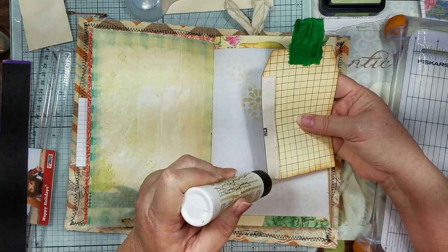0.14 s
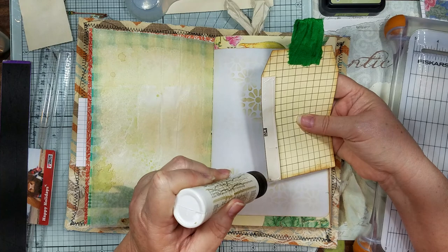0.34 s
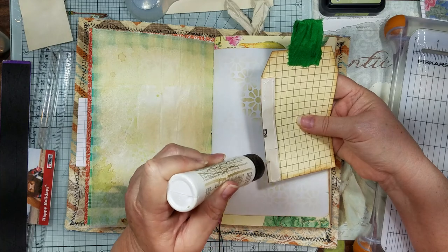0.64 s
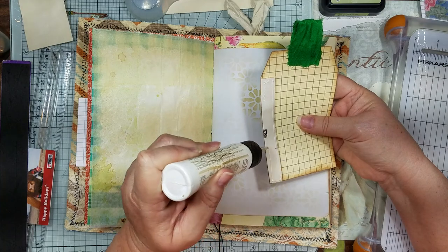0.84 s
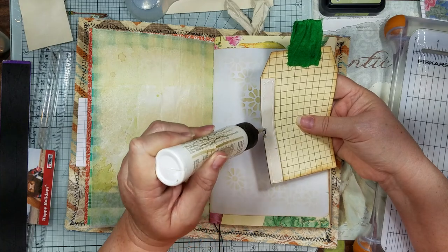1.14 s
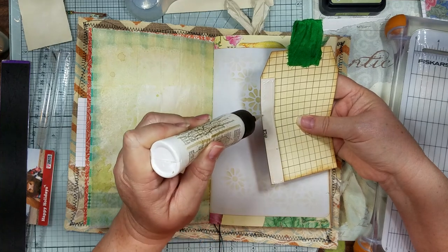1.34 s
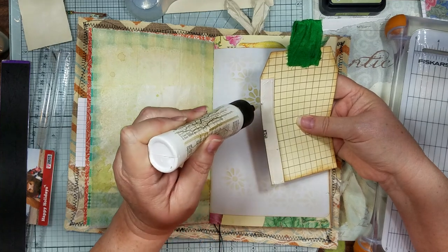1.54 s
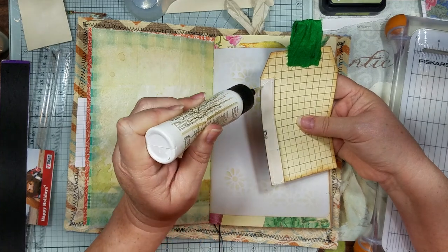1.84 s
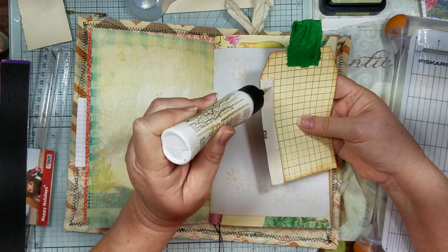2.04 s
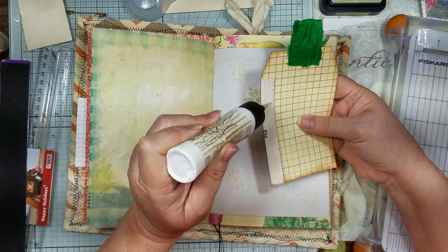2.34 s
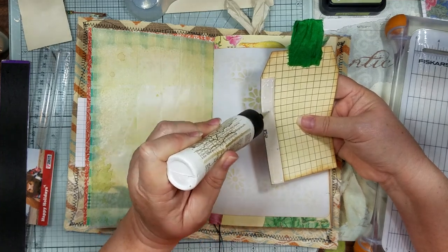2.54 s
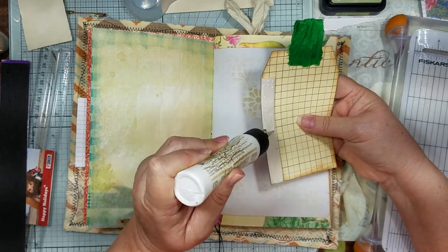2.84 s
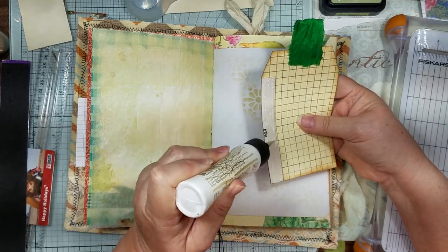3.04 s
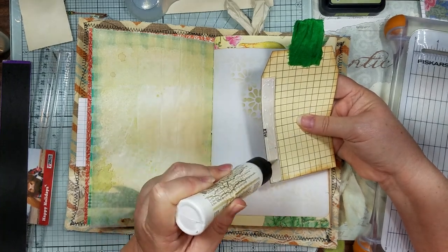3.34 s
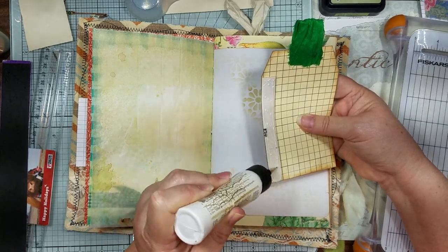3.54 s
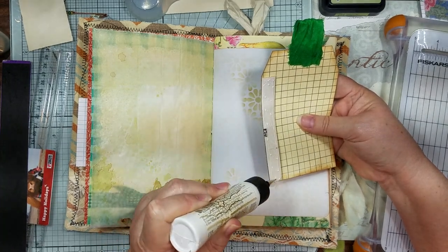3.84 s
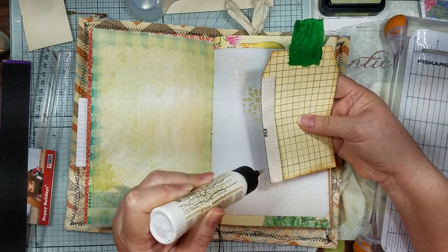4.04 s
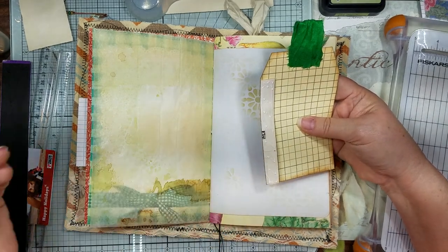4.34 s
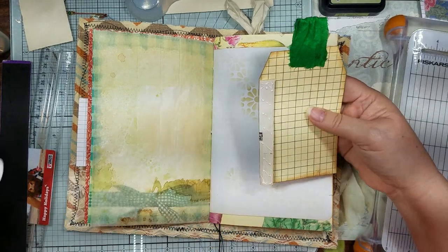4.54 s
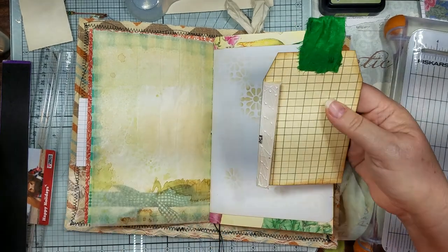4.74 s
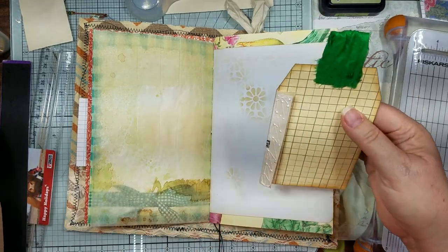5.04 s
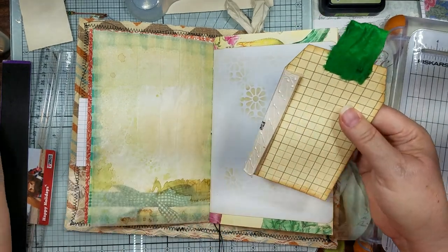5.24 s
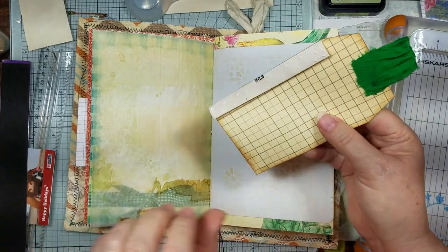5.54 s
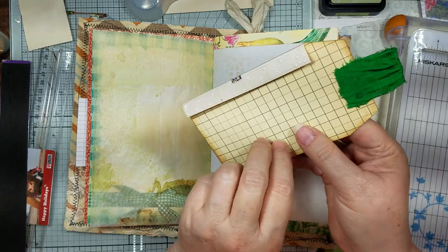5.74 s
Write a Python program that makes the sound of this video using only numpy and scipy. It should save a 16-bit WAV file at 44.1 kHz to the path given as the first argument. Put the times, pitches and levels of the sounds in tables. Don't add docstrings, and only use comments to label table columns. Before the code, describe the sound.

Quiet close-up crafting: steady ventilation hum, light fizzy zigzag scratching on card, then a bottle set down and crisp paper clicks.

```python
import sys
import numpy as np
from scipy import signal
from scipy.fft import rfft, irfft, next_fast_len
from scipy.io import wavfile
from scipy.ndimage import uniform_filter1d, map_coordinates

SR = 44100
rng = np.random.default_rng(int(sys.argv[2]) if len(sys.argv) > 2 else 0)


def transcribe(u):
    v = np.clip(np.atleast_2d(u).T, -1, 1)
    q = np.round(v * 32767).astype(np.int16)
    wavfile.write(sys.argv[1], SR, q)


def makeup_ratio(level_db):
    decades = np.asarray(level_db, float) / 20
    return 10 ** decades


N = 260013
TOP_HZ = 15800
TIP_LAG, CLOTH_LAG, AIR_LAG = 1, 0, -4
# (f/Hz, likeness 0..1)
ALIKE = [(60, 0.94), (130, 1), (290, 0.94), (640, .8), (1410, 0.5), (3100, 0.016)]


def along(points, hz):
    f, v = np.transpose(points)
    return np.interp(np.log(hz + 1), np.log(f + 1), v)


def unit(x):
    return x / np.sqrt(np.mean(x ** 2) + 1e-20)


def filtered(x, response):
    m = next_fast_len(x.shape[-1] + 4096)
    spectrum = rfft(x, m) * response(np.fft.rfftfreq(m, 1 / SR))
    return irfft(spectrum, m)[..., :x.shape[-1]]


def peak(f, hz, width):
    return 1j * f * width / (hz * hz - f * f + 1j * f * width)


def swell(length, sharp):
    return np.sin(np.linspace(0, np.pi, round(length * SR))) ** sharp


def add(out, x, s, pan_db, lag, wet_db):
    # (f/Hz, t60/s)
    walls = [(150, 0.43), (1000, 0.063), (10000, 0.039)]
    hz, t, z = signal.stft(rng.standard_normal((2, SR // 8)), SR, nperseg=128)
    alike = np.clip(along(ALIKE, hz), 0, 1)[:, None]
    z[1] = alike * z[0] + np.sqrt(1 - alike ** 2) * z[1]
    decay = makeup_ratio(-60 * t / along(walls, hz)[:, None])
    tail = signal.istft(z * decay, SR, nperseg=128)[1]
    tail[:, :40] = 0
    heard = makeup_ratio(wet_db) * tail / np.linalg.norm(tail[0])
    heard[:, 0] = 1
    for ear, path, side in zip(out, heard, (1, -1)):
        start = round(s * SR) + (side > 0) * round(lag)
        part = ear[start:][:len(x) + len(path) - 1]
        part += makeup_ratio(side * pan_db / 2) * signal.fftconvolve(x, path)[:len(part)]


def hum():
    # (f/Hz, width/Hz, level/dB)
    room_modes = [(57.4, 8.1, -8), (76, 12.4, -7.5), (106.5, 16.7, -4), (120.3, 7.4, 1.5), (135, 13.3, -2),
                  (168.7, 21.4, -0.5), (182.9, 16.3, -8.5), (246.4, 30, -8), (298, 40, -18.5),
                  (377, 34, -28.5), (494.7, 48, -22.5), (611, 38, -22.5), (677, 8.6, -22)]
    # (f/Hz, density/dB per Hz)
    airflow = [(25, -34), (50, -18), (200, -24), (400, -24.5), (800, -27.5), (1500, -30), (3000, -37.5),
               (5000, -48), (7000, -56), (9000, -101)]
    level_db, drift_db, drifts_per_s = -50, 1, 2.24

    def colour(f):
        modes = sum(abs(makeup_ratio(db) * peak(f, hz, w) ** 2) ** 2 for hz, w, db in room_modes)
        return np.sqrt(makeup_ratio(2 * along(airflow, f)) + modes)

    def mid_and_side(f):
        angle = np.arccos(np.clip(along(ALIKE, f), -1, 1)) / 2
        return colour(f) * [np.cos(angle), np.sin(angle)]

    mid, side = filtered(rng.standard_normal((2, N)), mid_and_side)
    drift = map_coordinates(rng.standard_normal(30), [np.arange(N) / SR * drifts_per_s])
    pair = unit(np.array([np.roll(mid + side, 12), makeup_ratio(0.6) * (mid - side)]))
    return makeup_ratio(level_db + drift_db * drift) * pair


def rubbing(rows, glide, pan_db, lag, wet_db, grit_db, sharp, fizz_width, card_width, broad):
    # (f/Hz, density/dB per Hz)
    fibres = [(300, -120), (600, -21), (1000, -7), (2200, -11.5), (3200, -26), (5000, -26.5), (8000, -86)]
    out = np.zeros((2, N))
    for s, length, fizz_db, card_db, card_hz, fizz_hz in rows:
        shape = swell(1.15 * length, sharp)
        grains = uniform_filter1d(rng.standard_normal((2, len(shape))), 70)
        catches = rng.standard_normal((2, len(shape))) * makeup_ratio(grit_db * unit(grains))

        def fizz_colour(f):
            sheen = (f / 6500) ** 4 / (1 + (f / 6500) ** 4)
            return (peak(f, fizz_hz, fizz_width) + 1.06 * sheen) * (f < TOP_HZ)

        fizz = filtered(catches[0], fizz_colour)
        first, last = (filtered(catches[1], lambda f: peak(f, hz, card_width) + broad * makeup_ratio(along(fibres, f)))
                       for hz in card_hz * glide ** np.array([-.5, .5]))
        bend = np.clip(np.linspace(-.25, 1.25, len(shape)), 0, 1)
        card = (1 - bend) * first + bend * last
        rub = makeup_ratio(fizz_db + 3.0) * unit(fizz) + makeup_ratio(card_db - 0.5) * unit(card)
        add(out, shape * rub, s - length / 12, pan_db, lag, wet_db)
    return out


def handling():
    # (t/s, length/s, fizz level/dB, card level/dB, card f/Hz)
    rustles = [(.06, .24, -77, -69, 990), (4.39, 0.047, -68, -62, 1470), (4.45, 0.11, -69.5, -69, 1500),
               (4.566, .12, -77, -72, 1850), (4.648, .17, -84, -73, 3280), (4.83, 0.087, -71, -68, 1800),
               (5.083, .04, -72, -69, 1300), (5.229, .035, -74, -61.5, 1190),
               (5.234, 0.025, -90, -66, 3120), (5.219, .17, -73.5, -80, 1000), (5.4, .37, -97, -68.5, 1840),
               (5.45, 0.52, -103, -74.5, 3060), (5.754, 0.037, -66.5, -71, 2220),
               (5.804, .02, -73, -74, 1800), (5.813, 0.084, -72, -66, 1810)]
    cloth_hz = 12600
    rows = [(*row, cloth_hz) for row in rustles]
    return rubbing(rows, glide=0.96, pan_db=-0.8, lag=CLOTH_LAG, wet_db=3, grit_db=2.5, sharp=0.35,
                   fizz_width=41000, card_width=380, broad=1.9)


def whistles():
    # (t/s, length/s, level/dB, f/Hz, width/Hz)
    squeaks = [
        (.32, 0.072, -66, 780, 450),
        (0.068, 0.2, -69.5, 9100, 1400),
        (4.4, 0.022, -57.5, 4540, 980),
        (4.46, 0.099, -65.5, 4170, 430),
    ]
    out = np.zeros((2, N))
    for s, length, db, hz, width in squeaks:
        shape = swell(length, .9)
        air = filtered(rng.standard_normal(len(shape)), lambda f: peak(f, hz, width) ** 2)
        add(out, makeup_ratio(db) * shape * unit(air), s, -3.5, AIR_LAG, wet_db=-0.5)
    return out


def nozzle():
    # (t/s, length/s, pressure level/dB, card f/Hz, card over fizz/dB)
    strokes = [(0.617, 0.04, -76, 1690, 3), (.7, .1, -79, 1110, 4), (.93, 0.047, -78, 1100, 1),
               (1.1, 0.16, -79.5, 1900, 1), (1.598, .12, -79.5, 1600, 3), (1.972, 0.044, -85, 1900, 10),
               (2.109, 0.055, -73, 1780, 8), (2.237, .08, -71.5, 1730, 5), (2.343, .055, -71.5, 1860, 13),
               (2.488, 0.06, -75, 1370, 12), (2.606, 0.051, -77.5, 1470, 17.5),
               (2.707, .105, -69, 1280, 5.5), (2.838, 0.074, -69, 1520, 4.5),
               (2.961, 0.084, -65, 1400, 0.5), (3.095, .061, -67.5, 1770, 4),
               (3.23, 0.089, -67.5, 1390, -1), (3.361, .07, -69, 1400, 2.5),
               (3.485, 0.078, -67.5, 1660, 2.5), (3.611, 0.052, -70.5, 1150, 1),
               (3.709, 0.086, -74, 1300, 0), (3.84, 0.065, -82.5, 1140, 12), (3.965, 0.026, -73, 1050, 0),
               (4.147, 0.042, -75, 1030, -6)]
    # (t/s, f/Hz)
    tip_path = [(2.1, 11100), (2.3, 10400), (2.5, 11300), (3.02, 10500), (3.26, 8200), (3.55, 9150),
                (3.64, 12000), (4.1, 12600)]
    s, length, db, card_hz, boom_db = np.transpose(strokes)
    fizz_hz = np.interp(s, *np.transpose(tip_path))
    rows = zip(s, length, db, db + boom_db, card_hz, fizz_hz)
    return rubbing(rows, glide=1.14, pan_db=-3.5, lag=TIP_LAG, wet_db=-1.0, grit_db=5.5, sharp=0.72,
                   fizz_width=680, card_width=200, broad=1.4)


def snaps():
    # (t/s, peak level/dB, ring f/Hz, ring level/dB, pushes 1 or pulls -1)
    releases = [(3.142, -44, 3600, -7, 1), (3.98, -52, 9000, -12, 1), (4.4027, -40, 1600, 0, 1),
                (4.805, -42, 7000, -18, 1), (5.0802, -24.5, 2320, -17, 1), (5.081, -30.5, 1330, -4.5, 1),
                (5.0821, -41, 4800, -1, -1), (5.0854, -34, 1250, -1.5, -1), (5.113, -53, 12500, 1, 1),
                (5.7688, -29.5, 1190, -16, -1), (5.7697, -37, 4800, -7, -1), (5.8, -24.5, 1830, -11.5, -1)]
    t60_at_1k, slope = 0.0085, 0.48
    out, t = np.zeros((2, N)), np.arange(SR // 20) / SR
    spike = (1 - t / 0.0018) * np.exp(-t / .00009)
    for s, db, hz, ring_db, way in releases:
        t60 = t60_at_1k * (1000 / hz) ** slope
        crackle = 0.35 * np.diff(rng.standard_normal(len(t) + 1)) * makeup_ratio(-60 * t / (0.62 * t60))
        ring = makeup_ratio(ring_db - 60 * t / t60) * np.cos(2 * np.pi * hz * t)
        add(out, makeup_ratio(db) * (crackle + np.sign(way) * (.8 * spike + ring)), s, .5, TIP_LAG, wet_db=-5.5)
    return out


def thuds():
    # (t/s, level/dB, contact/s, left lag/samples, left over right/dB)
    blows = [
        (4.46, -20, .0006, 7, -1.5),
        (4.8458, -25, .0005, -5, 0),
    ]
    # (f/Hz, level/dB, t60/s, moves with 1 or against -1 the blow)
    desk = [(164, -2.5, .057, 1), (212, -4, .13, 1), (320, -7, .08, -1), (410, 5.5, .011, -1),
            (618, 0, .052, 1), (862, -9, .05, -1), (1235, -12, .04, -1), (1700, -28, .04, 1)]
    book = [(108, .5, .07, 1), (166, 0, .065, -1), (396, -14, .17, -1), (838, -17, .045, -1),
            (1211, -22, .04, 1)]
    rattle_levels = (-16, -30)
    out, t = np.zeros((2, N)), np.arange(SR // 4) / SR
    for (s, db, contact, lag, pan_db), modes, rattle_db in zip(blows, (desk, book), rattle_levels):
        ring = sum(way * makeup_ratio(level - 60 * t / t60) * np.sin(2 * np.pi * hz * t)
                   for hz, level, t60, way in modes)
        loose = unit(filtered(rng.standard_normal(len(t)),
                              lambda f: peak(f, 620, 1170) ** 2 + 0.2 * peak(f, 2000, 1200)))
        rattle = makeup_ratio(rattle_db - 60 * t / 0.16) * loose
        onset = (1 - np.exp(-t / contact)) ** 2
        add(out, makeup_ratio(db) * (ring + rattle) * onset, s, pan_db, lag, wet_db=-19.0)
    return filtered(out, lambda f: f ** 2 / (50 ** 2 + f ** 2) / (1 + (f / 2800) ** 4))


def housing(f):
    return 1 - 0.5 * peak(f, 7400, 4000) + 0.23 * peak(f, 17000, 5200)


def scene():
    paper = filtered(handling() + snaps(), housing)
    return hum() + paper + whistles() + nozzle() + thuds()


def band_limit(x):
    return signal.sosfilt(signal.butter(12, 16590, fs=SR, output="sos"), x)


def record(dry):
    # (f/Hz, density/dB per Hz)
    hiss_colour = [(1470, -4.5), (2500, -6), (3010, -7), (3510, -12), (7190, -17.5), (9870, -13),
                   (11800, -10.5), (15100, -8), (15800, -6.5)]
    hiss = unit(filtered(rng.standard_normal(dry.shape), lambda f: makeup_ratio(along(hiss_colour, f)) * (f < TOP_HZ)))
    limited = filtered(dry + makeup_ratio(-69.5) * hiss, lambda f: np.where(f < TOP_HZ, 1, makeup_ratio(-21)))
    return band_limit(limited - .0005)


dry = scene()
out = record(dry)
transcribe(out)
```